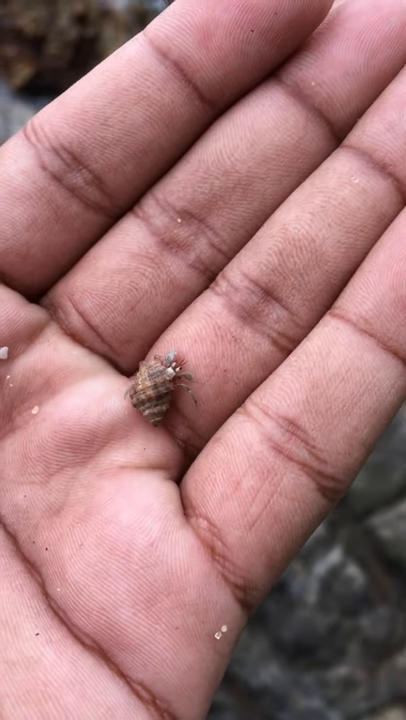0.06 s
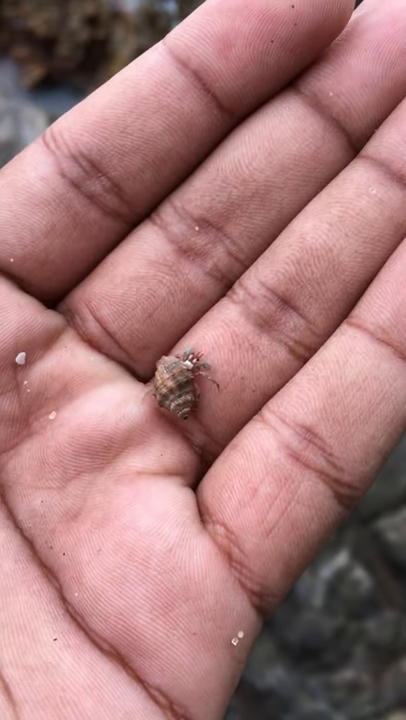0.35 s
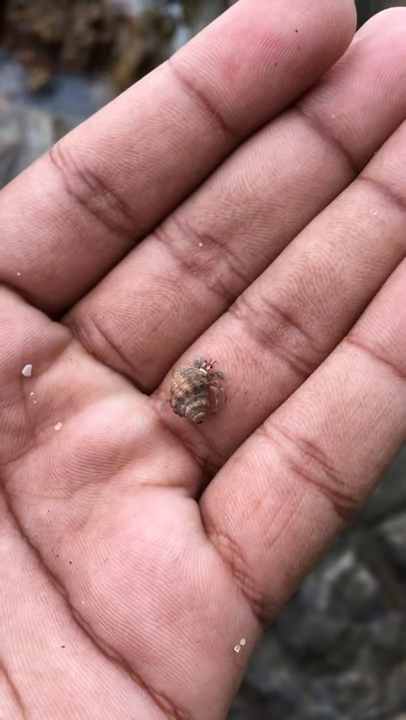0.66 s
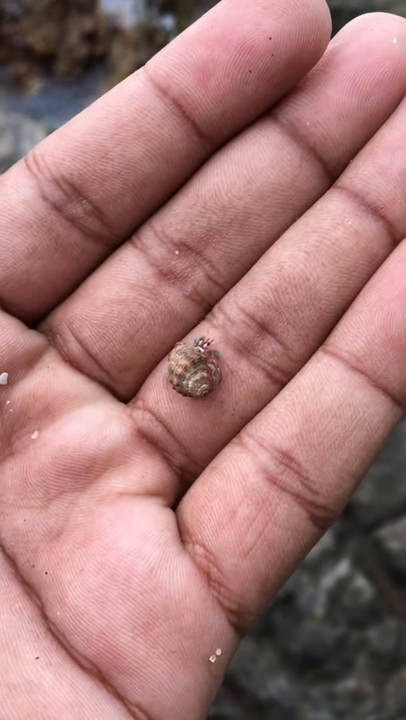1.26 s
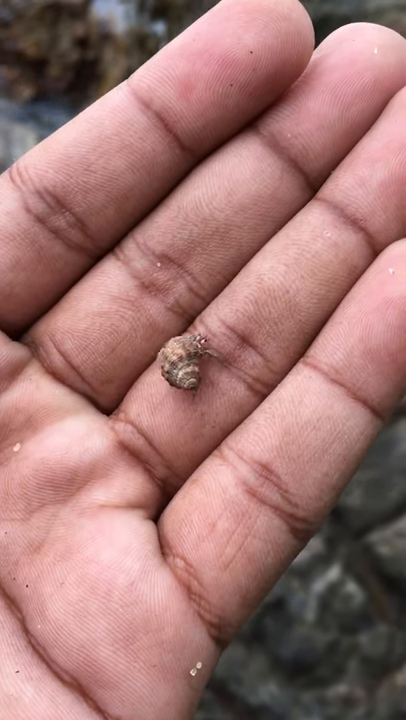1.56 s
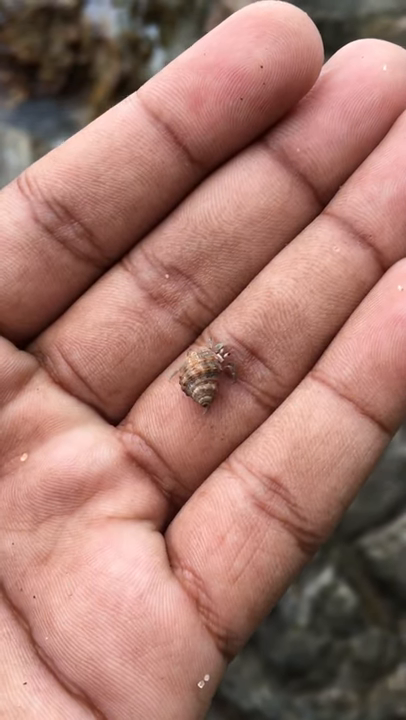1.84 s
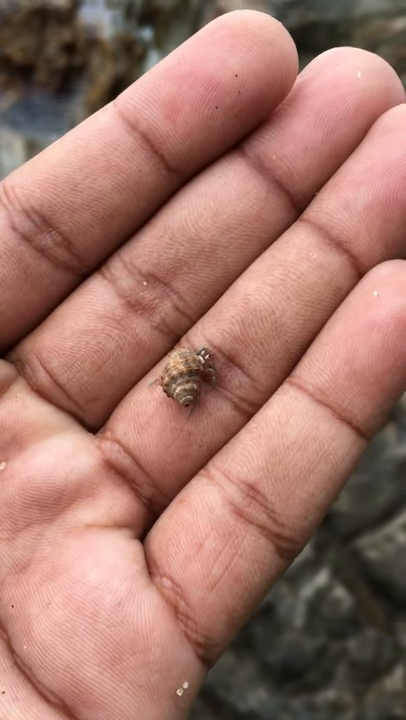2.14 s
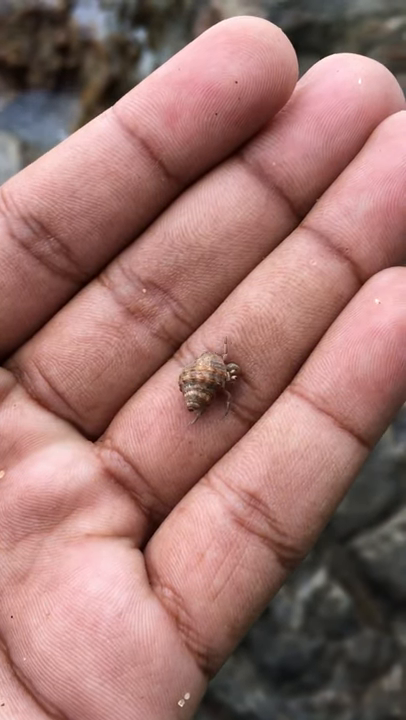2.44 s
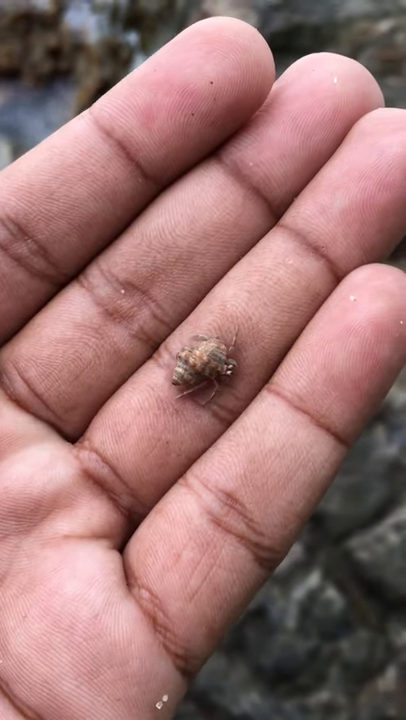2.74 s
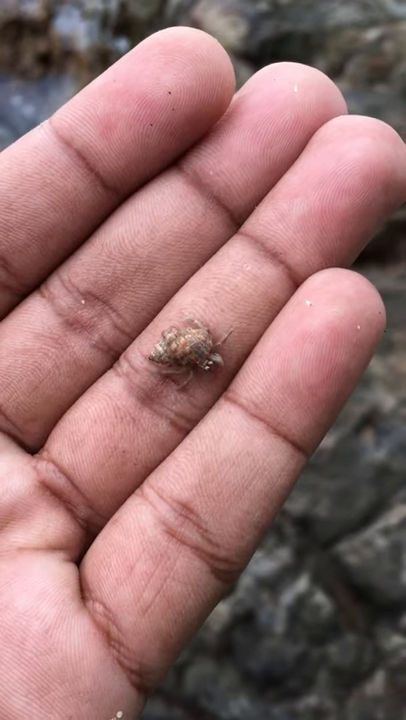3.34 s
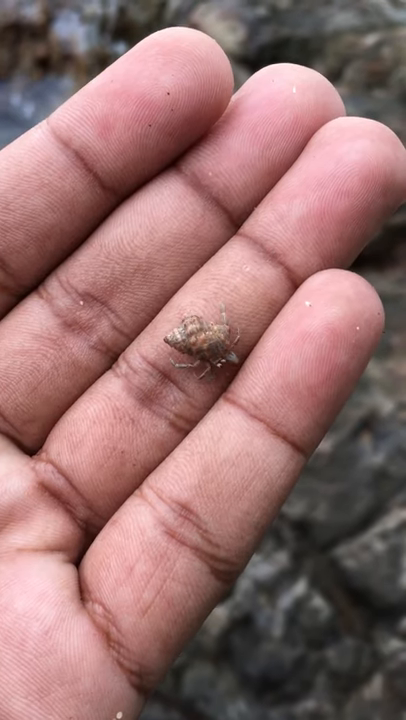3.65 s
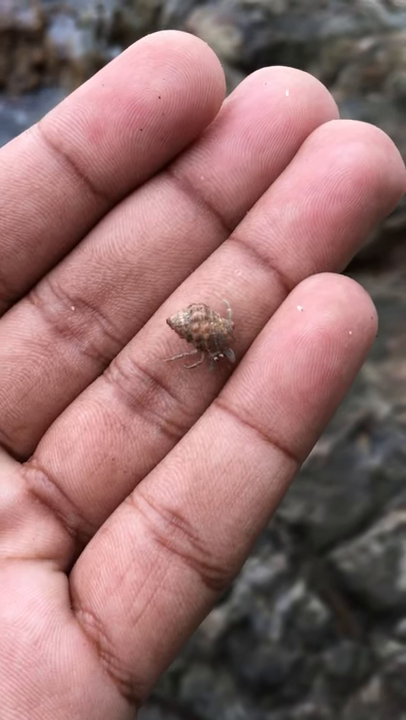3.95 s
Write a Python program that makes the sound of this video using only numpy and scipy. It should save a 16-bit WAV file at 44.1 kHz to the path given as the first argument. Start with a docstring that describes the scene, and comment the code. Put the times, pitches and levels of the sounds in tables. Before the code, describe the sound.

Wind buffets a microphone in low, fluttering gusts over faint waves on a rocky shore.

```python
"""Gusty wind rumbles and thumps on a small microphone, with soft surf on a rocky shore behind it.
Large eddies rumble on the microphone's port; in the gusts small, fast eddies hit it as sharp,
fluttering thumps, and now and then a hard one knocks. Further back the surf washes, foam fizzes
away and water slaps lightly on the rocks, while tiny drops tick close by."""
import sys
import numpy as np
from scipy import signal
from scipy.fft import rfft, irfft
from scipy.io import wavfile
from scipy.ndimage import uniform_filter1d, minimum_filter1d

SR = 44100
rng = np.random.default_rng(int(sys.argv[2]) if len(sys.argv) > 2 else 0)


def put_to_file(sound):
    """Save the sound as 16-bit audio at rate SR, in the file named by the first command-line argument."""
    columns = np.atleast_2d(sound).T  # one column per channel
    safe = np.clip(columns, -1, 1)
    whole_steps = np.round(safe * 32767)
    wavfile.write(sys.argv[1], SR, whole_steps.astype(np.int16))


N = 176400

# wind at the port (time [s], rumble level [dB], buffet level [dB], flutter level before its boost [dB])
GUSTS = [(0.0, -14.5, -20, -32), (0.1, -18, -14, -18.5), (0.18, -20.5, -14, -27), (0.23, -24, -25, -38),
         (0.24, -25, -26, -28.5), (0.3, -16, -14, -25.5), (0.38, -20, -19.5, -33.5),
         (0.42, -29, -16.5, -30.5), (0.49, -14, -26, -32), (0.53, -21.5, -16.5, -28.5),
         (0.62, -19, -22, -35.5), (0.67, -19.5, -11, -22.5), (0.7, -17, -28.5, -32.5),
         (0.76, -20, -14, -22.5), (0.77, -28, -22, -43), (0.81, -12.5, -20.5, -31.5),
         (0.86, -22, -23, -40.5), (0.92, -15, -12, -22.5), (1.0, -26, -22.5, -32.5),
         (1.17, -23, -14.5, -26.5), (1.21, -25.5, -25.5, -37), (1.27, -34.5, -45, -42.5),
         (1.35, -25.5, -44, -45), (1.39, -25.5, -18.5, -28.5), (1.45, -9.5, -20, -30),
         (1.51, -18.5, -17.5, -30), (1.68, -15, -15.5, -23), (1.82, -16, -18.5, -28), (1.86, -20, -24, -50),
         (1.89, -9, -13, -28), (1.97, -15.5, -23.5, -39), (2.04, -15, -16, -25), (2.15, -18, -16.5, -38.5),
         (2.19, -18, -12, -22.5), (2.24, -16, -28.5, -33.5), (2.33, -12.5, -15, -23.5),
         (2.35, -18.5, -19, -33), (2.52, -11.5, -22, -33.5), (2.56, -18, -8, -16.5),
         (2.61, -15, -20.5, -32), (2.65, -8.5, -21.5, -26.5), (2.71, -28, -25, -46), (2.74, -13, -10, -22),
         (2.77, -14, -23.5, -32.5), (2.88, -21, -12, -25), (2.92, -34, -34, -40), (2.96, -20, -15, -24),
         (2.99, -23, -35, -30.5), (3.03, -12.5, -12.5, -20.5), (3.21, -16, -16.5, -26),
         (3.32, -20.5, -20.5, -44), (3.35, -17, -14, -22.5), (3.41, -19, -18.5, -32.5),
         (3.48, -19, -14, -21.5), (3.55, -24, -17.5, -21.5), (3.61, -22, -18.5, -27.5),
         (3.68, -31, -28, -33.5), (3.73, -19.5, -17.5, -25), (3.88, -14.5, -21.5, -32.5),
         (4.0, -33.5, -29.5, -45)]


def undb(db):
    """Decibels to gain."""
    return 10 ** (np.asarray(db) / 20)


def unit(x):
    """Scale to rms 1."""
    return x / np.sqrt(np.mean(x ** 2))


def curve(table, column):
    """One column of a time table as an automation curve, at every sample."""
    rows = np.array(table)
    return np.interp(np.arange(N) / SR, rows[:, 0], rows[:, column])


def colour(x, points, size=8192):
    """Minimum-phase EQ through (frequency [Hz], level [dB]) points; output at rms 1."""
    hz, db = np.array(points, float).T
    bin_hz = np.arange(size // 2 + 1) * SR / size + 1
    gain = undb(np.interp(np.log(bin_hz), np.log(hz), db))
    cepstrum = irfft(np.log(gain))
    cepstrum[1:size // 2] *= 2  # folded forward, so nothing rings ahead of a hit
    cepstrum[size // 2 + 1:] = 0
    response = irfft(np.exp(rfft(cepstrum)))
    return unit(irfft(rfft(x) * rfft(response, N), N))


def drift(hz):
    """Smooth random movement, mostly slower than hz, at rms 1."""
    bin_hz = np.arange(N // 2 + 1) * SR / N
    return unit(irfft(rfft(rng.standard_normal(N)) / (1 + (bin_hz / hz) ** 2), N))


def impulses(per_s, scatter_db):
    """Random pushes and pulls of scattered strength."""
    hits = rng.random(N) < per_s / SR
    return hits * rng.choice([-1, 1], N) * undb(scatter_db * rng.standard_normal(N))


def steady(x, window_s=0.052):
    """Hold the mean power of a turbulent flow near 1, keeping its quick flutter."""
    span = int(window_s * SR)
    power = uniform_filter1d(uniform_filter1d(x ** 2, span), span // 2)
    return x / np.sqrt(np.abs(power) + 1e-6)


def surf(wash_boost_db=6, foam_boost_db=0.5, swell_db=1.16, fizz_db=-5.5):
    """A smooth distant wash, and nearer foam that hisses with tiny bursting bubbles."""
    # ebb of the surf, before the boosts (time [s], wash level [dB], foam level [dB])
    levels = [ [(0.0, -42, -50), (0.29, -47.5, -50.5), (0.57, -45.5, -49), (0.91, -47, -52.5),
              (1.4, -46.5, -51.5), (1.64, -48, -54.5), (3.54, -50, -57.5), (4.0, -46.5, -54.5)], ][0]
    # tone of the wash and of the foam (frequency [Hz], relative level [dB])
    wash_eq = [(150, 0), (500, 3.5), (1200, 4), (1800, -2.5), (2250, -2), (2900, -8), (3900, -8),
               (4900, -15.5), (8000, -30)]
    foam_eq = [(2500, -1), (4800, -5), (5600, 1), (6900, -0.5), (7700, -4), (8700, -1), (9800, -4),
               (10400, -11.5), (11200, -5), (13000, -9.5), (15700, -16)]
    wash = colour(rng.standard_normal(N), wash_eq)
    wash *= undb(curve(levels, column=1) + wash_boost_db + swell_db * drift(hz=4.9))
    hiss = rng.standard_normal(N)
    fizz = undb(fizz_db) * unit(impulses(per_s=550, scatter_db=4.5))
    foam = colour(hiss + fizz, foam_eq) * undb(curve(levels, column=2) + foam_boost_db)
    return wash + foam


def slaps(attack_s=0.0012, half_width_octaves=0.39, grain_depth=0.35):
    """Water slaps on rock: each splash is a quick, grainy burst of spray that dies away."""
    # small splashes (time [s], level [dB], centre [Hz], decay [s])
    splashes = [(0.171, -31.5, 4670, .007), (.172, -48, 9000, .02), (.342, -45.5, 11000, 0.027),
                (.448, -45, 6000, .04), (.574, -46, 8000, .015), (.794, -47, 11500, 0.0035),
                (.982, -40, 4500, .006), (1.122, -35, 2130, 0.022), (1.123, -40.5, 7100, 0.013),
                (1.308, -42, 8000, 0.0041)]
    out = np.zeros(N)
    bin_hz = np.arange(N // 2 + 1) * SR / N + 1
    for start, db, hz, decay in splashes:
        age = np.maximum(np.arange(N) / SR - start, 0)
        band = 1 / np.sqrt(1 + (np.log2(bin_hz / hz) / half_width_octaves) ** 4)
        spray = unit(irfft(rfft(rng.standard_normal(N)) * band, N))
        grain = unit(np.exp(grain_depth * drift(hz=200)))
        envelope = (1 - np.exp(-age / attack_s)) * np.exp(-age / decay)
        out += undb(db) * spray * grain * envelope
    return out


def drops(count=140, low_hz=3500, high_hz=13000, decay_s=0.0005, faintest_db=-51.5, scatter_db=2.6):
    """Tiny drops and bubbles close by, each a faint high tick."""
    out = np.zeros(N)
    age = np.arange(1024) / SR
    for when, pitch, faintness in rng.random((count, 3)):
        start = int(when * (N - len(age)))
        hz = low_hz + pitch * (high_hz - low_hz)
        db = faintest_db - scatter_db * np.log(faintness + 0.017)  # a few stand out
        ping = np.sin(2 * np.pi * hz * age) * np.exp(-age / decay_s)
        out[start:start + len(age)] += undb(db) * ping
    return out


def rumble(eddies_per_s=500, scatter_db=2):
    """Large, slow eddies overlap into a deep rumble; middling ones buffet above it."""
    # tone of the large and of the middling eddies (frequency [Hz], relative level [dB])
    deep_eq = [(22, -51), (40, -12.5), (62, -0.5), (100, 0), (150, -3.5), (220, -14), (400, -32),
               (1200, -71.5)]
    buffet_eq = [(40, -29), (110, -6.5), (190, -0.5), (290, -1.5), (420, -7.5), (650, -20.5), (1200, -38.5),
                 (2500, -67)]
    deep = steady(colour(impulses(eddies_per_s, scatter_db), deep_eq))
    buffet = steady(colour(impulses(eddies_per_s, scatter_db), buffet_eq))
    return deep * undb(curve(GUSTS, column=1)) + buffet * undb(curve(GUSTS, column=2))


def flutter(typical_width_s=0.00018, log_scatter=0.65, shorten_per_db=0.18, boost_db=4.5):
    """Each small eddy is one short push; faster air carries it past sooner, so it sounds brighter."""
    # tone of the small eddies (frequency [Hz], relative level [dB])
    flutter_eq = [(40, -33.5), (130, -5), (300, -3), (560, 2), (800, -4), (1100, -11), (1500, -22),
                  (2100, -34), (4000, -54)]
    gust_db = curve(GUSTS, column=3)
    hits = impulses(per_s=520, scatter_db=4)
    shortening = shorten_per_db * (gust_db - gust_db.mean())
    width_s = typical_width_s * np.exp(log_scatter * rng.standard_normal(N) - shortening)
    centres = np.flatnonzero(hits)[:, None]
    lag = np.arange(-128, 129)
    pushes = np.exp(-0.5 * (lag / SR / width_s[centres]) ** 2)
    pushes *= hits[centres] / pushes.sum(axis=1, keepdims=True)  # a shorter push peaks higher
    pressure = np.bincount(((centres + lag) % N).ravel(), pushes.ravel(), N)
    return steady(colour(pressure, flutter_eq)) * undb(gust_db + boost_db)


def knocks():
    """A hard eddy is one lone swing of pressure: a push between two shallow pulls."""
    # hard eddies that knock on the port (time [s], peak level [dB], centre [Hz])
    hard_eddies = [(.478, -5.5, 109), (.6555, -9.5, 740), (0.6698, -7.5, 400), (0.6878, -3.5, 100),
                   (.7515, -8, 645), (0.8011, -5.5, 332), (1.399, -8, 696), (1.6615, -5, 646),
                   (1.672, 0.5, 176), (2.194, 1, 393), (2.395, -10, 685), (2.727, -10.5, 585),
                   (2.8505, -5, 600), (3.126, -5, 587), (3.487, -1.5, 520), (3.6147, -9.5, 990)]
    out = np.zeros(N)
    for when, db, hz in hard_eddies:
        phase = np.pi * hz * (np.arange(N) / SR - when)
        out += undb(db) * (1 - 2 * phase ** 2) * np.exp(-phase ** 2)
    return out


def scene():
    """Wind on the port over the sea, in mono."""
    wind = rumble() + flutter() + knocks()
    sea = surf() + slaps() + drops()
    return (wind + sea)[None]


def record(dry, ceiling=1, limiter_s=0.0086, top_hz=15700):
    """A quick limiter ducks the highest peaks; a steep low-pass cuts the top."""
    span = int(limiter_s * SR)
    needed_gain = np.minimum(1, ceiling / (np.abs(dry) + 1e-9))
    held_gain = minimum_filter1d(needed_gain, 2 * span)
    smooth_gain = uniform_filter1d(uniform_filter1d(held_gain, span), span)
    lowpass = signal.ellip(10, 0.1, 80, top_hz, fs=SR, output="sos")
    return signal.sosfilt(lowpass, dry * smooth_gain)


dry = scene()
out = record(dry)
put_to_file(out)
```